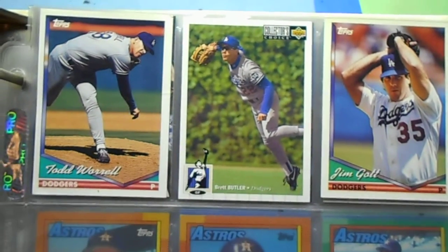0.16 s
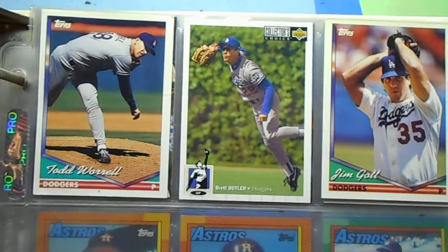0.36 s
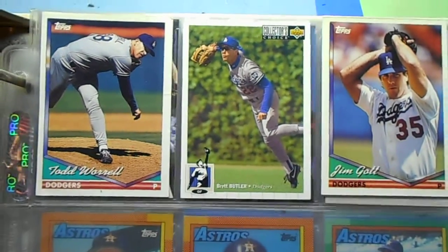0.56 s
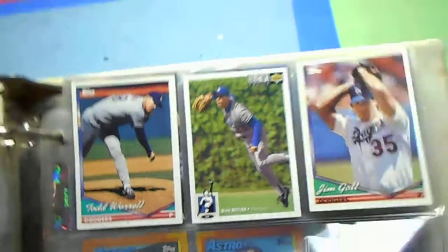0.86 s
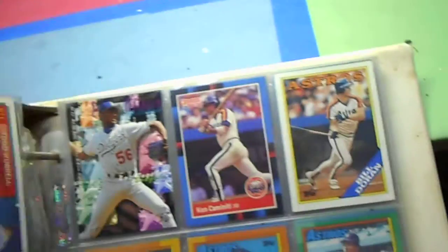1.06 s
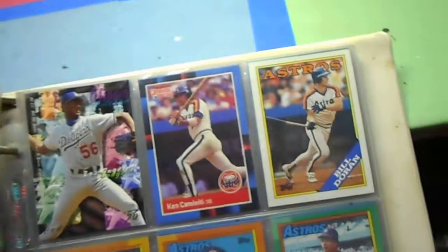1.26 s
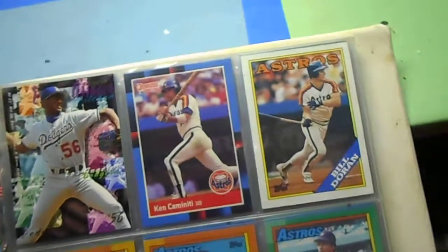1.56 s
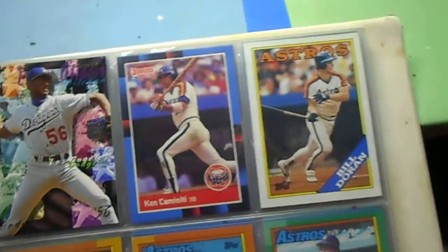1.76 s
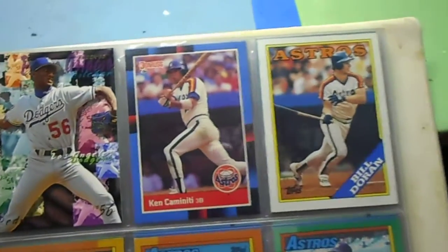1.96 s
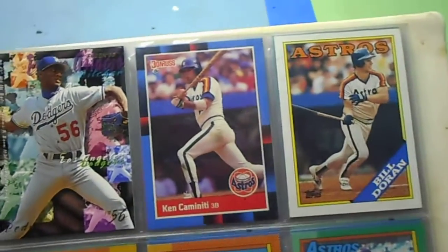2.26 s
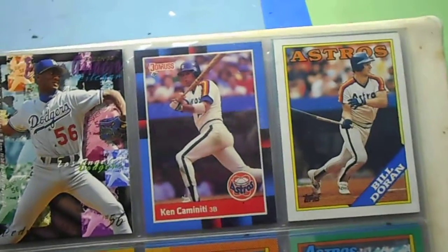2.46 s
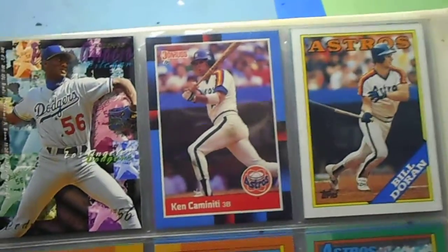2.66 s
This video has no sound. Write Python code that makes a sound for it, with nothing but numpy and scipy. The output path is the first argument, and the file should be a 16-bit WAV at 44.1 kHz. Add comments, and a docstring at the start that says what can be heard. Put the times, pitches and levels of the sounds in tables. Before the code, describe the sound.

A stiff plastic binder page flips with crackly rustling, followed by faint taps and a bright snap

```python
"""In a quiet small room, a plastic sleeve page full of cards is turned in a ring binder close to the microphone.
The page ticks on a ring (damped modes), slides (noise grains), crinkles and pops (short decaying sines)
and pushes air at the microphone (low noise). Two light taps, a brief brush and a faint squeak on a ring
(wavering resonances) follow, then a sharp, chattering click (bright modes and grit)."""
import sys
import numpy as np
from scipy import signal
from scipy.fft import rfft, irfft
from scipy.io import wavfile

SR = 44100
rng = np.random.default_rng(int(sys.argv[2]) if len(sys.argv) > 2 else 0)


def put_to_file(sound):
    """Save the sound as 16-bit audio at rate SR, in the file named by the first command-line argument."""
    columns = np.atleast_2d(sound).T  # one column per channel
    safe = np.clip(columns, -1, 1)
    whole_steps = np.round(safe * 32767)
    wavfile.write(sys.argv[1], SR, whole_steps.astype(np.int16))


N = 123479


def undb(db):
    """Decibels to gain."""
    return 10 ** (np.asarray(db) / 20)


def colour(x, points):
    """Shape a spectrum by (frequency [Hz], level [dB]) points, then scale to a standard deviation of 1."""
    hz, db = np.array(points).T
    bins_hz = np.maximum(np.arange(N // 2 + 1) * SR / N, 1)
    gain = undb(np.interp(np.log(bins_hz), np.log(hz), db))
    shaped = irfft(rfft(x) * gain, N)
    return shaped / np.std(shaped)


def noise(points):
    """Coloured Gaussian noise with a standard deviation of 1."""
    return colour(rng.standard_normal(N), points)


def curve(rows, axis=1):
    """Gain over time from one dB column of a table, silent outside it."""
    rows, t = np.array(rows), np.arange(N) / SR
    gain = undb(np.interp(t, rows[:, 0], rows[:, axis]))
    return gain * (t > rows[0, 0]) * (t < rows[-1, 0])


def add(out, start_s, sound):
    """Mix a sound in at a time."""
    i = int(start_s * SR)
    out[i:i + len(sound)] += sound[:N - i]


def decay_60db(t, t60):
    """Exponential decay by 60 dB in t60, in the unit of t."""
    return np.exp(-np.log(1000) * t / t60)


def fade(time_constant_s):
    """A short exponential decay."""
    return np.exp(-np.arange(SR // 6) / SR / time_constant_s)


def ring(modes):
    """Damped sines of a struck object."""
    t = np.arange(SR // 6) / SR
    return sum(undb(db) * np.sin(2 * np.pi * hz * t) * decay_60db(t, t60_s) for hz, db, t60_s in modes)


def highpass(x, hz):
    """Thin out the bass."""
    return signal.sosfilt(signal.butter(2, hz, "high", fs=SR, output="sos"), x)


def wander(points_per_s):
    """Random motion with a spread near 1: straight lines between Gaussian points."""
    steps = np.arange(N) / SR * points_per_s
    return 1.2 * np.interp(steps, np.arange(SR // 50), rng.standard_normal(SR // 50))


ROOM_T60_S, ROOM_ONSET_S = 0.22, 0.0012


def in_room(x, room_db):
    """Add the diffuse tail of a small room: decaying noise with a soft onset."""
    t = np.arange(SR // 2) / SR
    onset = 1 - np.exp(-(t / ROOM_ONSET_S) ** 2)
    tail = rng.standard_normal(len(t)) * decay_60db(t, ROOM_T60_S) * onset
    return x + undb(room_db) * signal.fftconvolve(x, tail / np.linalg.norm(tail))[:N]


# Room tone spectrum: (frequency [Hz], relative density [dB])
ROOM_TONE_COLOUR = [(15, -36), (25, 1.5), (240, -4.5), (394, -11), (1030, -16.5), (5160, -23.5),
                    (9890, -25), (12500, -45.5)]
ROOM_TONE_DB = -57


def room_tone():
    """Steady coloured noise of the quiet room."""
    return undb(ROOM_TONE_DB) * noise(ROOM_TONE_COLOUR)


# Air pushed at the microphone: (time [s], level [dB])
AIR_LEVEL = [(.6, -56.5), (.96, -51), (1.04, -60), (1.11, -32), (1.26, -47), (1.36, -41), (1.415, -28),
             (1.45, -42), (1.51, -34.5), (1.6, -51), (1.74, -47), (1.9, -66), (2.34, -58.5), (2.38, -41.5),
             (2.46, -66.5), (2.515, -46), (2.57, -59)]
# Air spectrum: (frequency [Hz], relative level [dB])
AIR_COLOUR = [(8, 6.5), (25, 1.5), (60, -2.5), (120, -6.5), (220, -32), (500, -48)]


def pushed_air():
    """The page pushes air at the microphone: low noise that swells and sinks."""
    return noise(AIR_COLOUR) * curve(AIR_LEVEL)


# Resonances of the rubbed ring: (frequency [Hz], width [Hz], relative level [dB])
SQUEAK_MODES = [(1182, 45, -2.5), (1443, 70, -3.5), (2435, 71, 3), (2934, 51, -9), (3560, 99, -3)]
SQUEAK_START_S, SQUEAK_END_S, SQUEAK_ATTACK_S, SQUEAK_RELEASE_S = 2.38, 2.728, 0.023, 0.19
SQUEAK_DB, SQUEAK_WAVER_RATIO, SQUEAK_WAVER_PER_S = -59.5, 0.00813, 11


def squeak():
    """A sleeve hole rubs along a metal ring, which sings faintly in narrow, wavering resonances."""
    t = np.arange(N) / SR
    attack = np.clip((t - SQUEAK_START_S) / SQUEAK_ATTACK_S, 0, 1)
    release = np.clip((SQUEAK_END_S - t) / SQUEAK_RELEASE_S, 0, 1)
    out = np.zeros(N)
    for hz, width_hz, db in SQUEAK_MODES:
        pitch_hz = hz * (1 + SQUEAK_WAVER_RATIO * wander(SQUEAK_WAVER_PER_S))
        phase = 2 * np.pi * np.cumsum(pitch_hz) / SR
        # random motion of both quadratures widens the line into a band
        out += undb(db) * (wander(2 * width_hz) * np.sin(phase) + wander(2 * width_hz) * np.cos(phase))
    return undb(SQUEAK_DB) * attack * release * out


# Light taps on the binder: (time [s], level [dB], weight of each mode [dB])
TAPS = [(2.1639, -41.5, (1, 2.5, -9, -3.5)), (2.226, -39.5, (0.5, -6, 0, -23))]
# Binder modes: (frequency [Hz], relative level [dB], t60 [s])
TAP_MODES = [(305, 1.5, 0.072), (1140, 2, 0.0051), (1840, 1, 0.012), (3740, -1, 0.033)]


def taps():
    """Light taps on the binder; the spot that is touched weights its modes."""
    out = np.zeros(N)
    for start_s, db, weights_db in TAPS:
        modes = [(hz, mode_db + w, t60_s) for (hz, mode_db, t60_s), w in zip(TAP_MODES, weights_db)]
        add(out, start_s, undb(db) * ring(modes))
    return out


# Sleeve ticking on a ring: (frequency [Hz], level re TICK_DB [dB], t60 [s])
TICK_MODES = [(603, -15.5, 0.012), (1100, -14.5, .0056), (1335, -6, 0.012), (1415, -36, 0.18),
              (1850, -10, 0.011), (3620, 0.5, 0.0095), (5940, -7, 0.004)]
# Cover hum under the knock: (frequency [Hz], level [dB], t60 [s])
COVER_MODE = [(138.7, -44, .3)]
# Spectrum of cracks and snaps: (frequency [Hz], relative level [dB])
SNAP_COLOUR = [(200, -8), (1000, -1.5), (3000, 4), (7000, -5.5), (10000, -10.5), (12000, -46)]
TICK_START_S, TICK_DB, TICK_LOW_HZ = .668, -15.5, 300
CRACK_DB, CRACK_DECAY_S = -15.5, 0.00075
SHIVER_DB, SHIVER_DECAY_S, SHIVER_HZ = -42.5, 0.039, 3900


def ring_tick():
    """The lifted page knocks on a binder ring: crack, damped modes, shivering film and humming cover."""
    modes, crack, shiver, cover = np.zeros((4, N))
    add(modes, TICK_START_S, undb(TICK_DB) * ring(TICK_MODES))
    add(crack, TICK_START_S, undb(CRACK_DB) * fade(CRACK_DECAY_S))
    add(shiver, TICK_START_S, undb(SHIVER_DB) * fade(SHIVER_DECAY_S))
    add(cover, TICK_START_S, ring(COVER_MODE))
    film = shiver * noise([(SHIVER_HZ / 2, -22), (SHIVER_HZ, 0), (SHIVER_HZ * 2, -26)])
    return highpass(modes + crack * noise(SNAP_COLOUR) + film, TICK_LOW_HZ) + cover


# Contacts of the click: (time [s], level re CLICK_DB [dB])
CLICK_CONTACTS = [(2.753, -3), (2.7535, -2), (2.7547, 2.5), (2.7557, 2.5), (2.757, -7.5), (2.759, -5.5),
                  (2.7626, -17)]
# Hard plastic modes: (frequency [Hz], relative level [dB], t60 [s])
CLICK_MODES = [(2070, -21, 0.012), (2990, -28, 0.031), (4040, -14.5, 0.018), (4900, -6, 0.013),
               (5010, -28.5, 0.15), (5740, -2.5, 0.009), (6980, 1, .01), (7370, -27, 0.098),
               (7590, -1.5, 0.012), (9500, -8.5, .006), (10140, -13.5, 0.011)]
CLICK_DB, CLICK_LOW_HZ, CLICK_DETUNE_RATIO = -9, 1360, 0.0034
GRIT_DB, GRIT_DECAY_S = -22, 0.00073  # level re each contact


def sharp_click():
    """Hard plastic snaps: a quick run of gritty contacts rings slightly detuned bright modes."""
    out, grit = np.zeros((2, N))
    chances = rng.standard_normal((len(CLICK_CONTACTS), len(CLICK_MODES)))
    for (start_s, db), chance in zip(CLICK_CONTACTS, chances):
        for (hz, mode_db, t60_s), c in zip(CLICK_MODES, chance):
            mode = ring([(hz * (1 + CLICK_DETUNE_RATIO * c), mode_db, t60_s)])
            add(out, start_s, undb(db) * np.sign(c) * mode)
        add(grit, start_s, undb(db + GRIT_DB) * fade(GRIT_DECAY_S))
    grit_noise = noise([(500, -13), (2000, -23), (6500, 15), (10000, -1), (12000, -27)])
    click = undb(CLICK_DB) * (out + grit * grit_noise)
    return highpass(highpass(click, CLICK_LOW_HZ), CLICK_LOW_HZ)


FLEX_DB, FLEX_PER_S, FLEX_OCTAVES = 3, 45, 0.3006  # dB per unit of wander; rate; band spacing


def flex(x):
    """The bending film strengthens and weakens overlapping neighbouring bands, each on its own."""
    octave = np.log2(np.clip(np.arange(N // 2 + 1) * SR / N, 200, 12000) / 200)
    spectrum, out = rfft(x), np.zeros(N)
    for k in range(int(octave[-1] / FLEX_OCTAVES) + 2):
        band_gain = np.maximum(1 - abs(octave / FLEX_OCTAVES - k), 0)
        band = irfft(spectrum * band_gain, N)
        out += band * undb(FLEX_DB * np.minimum(wander(FLEX_PER_S), 2))
    return out * np.std(x) / np.std(out)


# Sliding sleeve: (time [s], body level [dB], treble level [dB])
TURN = [(.55, -61.5, -66), (.76, -64, -56.5), (.81, -58, -55.5), (.88, -55, -57), (.96, -51.5, -55),
        (1.0, -60.5, -66.5), (1.05, -49.5, -45), (1.10, -39.5, -36.5), (1.14, -37.5, -37),
        (1.175, -43, -52.5), (1.22, -46.5, -45), (1.27, -42, -49.5), (1.31, -39, -44), (1.345, -37, -47),
        (1.385, -28, -31.5), (1.402, -33, -34), (1.413, -23.5, -35.5), (1.435, -39, -33),
        (1.485, -34, -37.5), (1.505, -26, -36.5), (1.54, -39, -48.5), (1.61, -43, -47), (1.645, -39.5, -40),
        (1.69, -48, -50), (1.715, -46, -39.5), (1.75, -42, -54), (1.78, -51, -46.5), (1.84, -47, -59),
        (1.89, -62, -68)]
# Settled page brushed twice: (time [s], body level [dB], treble level [dB])
BRUSH = [(2.33, -69, -69), (2.375, -58, -48.5), (2.41, -58, -56.5), (2.46, -57.5, -59.5),
         (2.498, -60, -48.5), (2.52, -61, -66)]
# Sleeve body spectrum: (frequency [Hz], relative level [dB])
BODY_COLOUR = [(70, -4), (160, 4), (450, 1), (900, -0.5), (1400, -3), (2200, -12), (4000, -60)]
# Sleeve treble spectrum: (frequency [Hz], relative level [dB])
TREBLE_COLOUR = [(700, -13.5), (1500, 2.5), (2500, 2), (4000, -1.5), (6500, -6.5), (10000, -11),
                 (11000, -26), (12300, -24)]
GRAINS_PER_S, GRAIN_SCATTER_DB, GRAIN_DECAY_S = 1300, 1.5, 0.00092  # scatter per unit of exponential draw
SMOOTH_SHARE = 1  # constant grip against grains of unit spread
CATCHES_PER_S, CATCH_DB = 70, 3  # dB per unit of catching


def rustle():
    """Dense stick-slip grains excite the body and treble of the sleeve, which catches and lets go."""
    size_db = GRAIN_SCATTER_DB * np.minimum(rng.exponential(size=N), np.pi)
    slips = (rng.random(N) < GRAINS_PER_S / SR) * undb(size_db)
    grains = signal.fftconvolve(slips, fade(GRAIN_DECAY_S))[:N]
    steps = np.arange(N) / SR * CATCHES_PER_S
    catching = np.interp(steps, np.arange(N), rng.uniform(-1.4, 1.5, N))
    grip = (SMOOTH_SHARE + grains / np.std(grains)) * undb(CATCH_DB * catching)
    body = colour(grip * rng.standard_normal(N), BODY_COLOUR)
    treble = colour(grip * rng.standard_normal(N), TREBLE_COLOUR)
    body *= curve(TURN) + curve(BRUSH)
    treble *= curve(TURN, axis=2) + curve(BRUSH, axis=2)
    return flex(body + treble)


POP_RISE_CYCLES, POP_T60_CYCLES = 0.41, 7.47


def pop(hz):
    """A patch of film swings up and dies away within a few cycles."""
    cycles = np.arange(SR // 12) / SR * hz
    rise = 1 - np.exp(-cycles / POP_RISE_CYCLES)
    return np.sin(2 * np.pi * cycles) * rise * decay_60db(cycles, POP_T60_CYCLES)


CRINKLES_PER_S, CRINKLE_LOW_HZ = 190, 210
CRINKLE_DB, CRINKLE_SCATTER_DB = 5, 3  # re TURN treble; per unit of exponential draw
CRINKLE_HZ, CRINKLE_OCTAVES = 1670, 1.92  # centre pitch; range each way


def crinkles():
    """Small creases pop at random times and pitches, following the treble level of the turn."""
    out, bend = np.zeros(N), curve(TURN, axis=2)
    for when, size, pitch, side in rng.random((int(CRINKLES_PER_S * N / SR), 4)):
        hz = CRINKLE_HZ * 2 ** (CRINKLE_OCTAVES * (2 * pitch - 1))
        size_db = CRINKLE_DB + CRINKLE_SCATTER_DB * min(-np.log(1 - size), 2)
        gain = bend[int(when * N)] * undb(size_db)
        add(out, when * N / SR, np.sign(side - .5) * gain * pop(hz))
    return highpass(out, CRINKLE_LOW_HZ)


# Buckling creases: (time [s], pitch [Hz], pop level re POP_DB [dB], bright snap level [dB])
CREASES = [(.647, 940, -35.5, -40), (.817, 517, -30, -36.5), (.823, 1030, -23.5, -44),
           (.869, 625, -35.5, -41), (.947, 394, -32.5, -44), (.948, 1610, -30, -55),
           (.952, 706, -29.5, -54), (.974, 700, -31.5, -52), (1.109, 2600, -36, -29.5),
           (1.139, 1520, -22, -35), (1.167, 780, -21.5, -50), (1.251, 970, -30.5, -48),
           (1.298, 1710, -28, -32), (1.382, 800, -10.5, -36), (1.4075, 1410, -9, -16.5),
           (1.409, 2260, -14, -15), (1.412, 270, -17.5, -24), (1.4153, 99, -18.5, -21),
           (1.4762, 1480, -11, -24), (1.4905, 460, -19.5, -25), (1.496, 286, -17.5, -22.5),
           (1.4997, 480, -23, -29), (1.553, 740, -19, -47), (1.571, 1980, -18, -29.5),
           (1.5828, 575, -13.5, -36), (1.632, 1720, -24.5, -35.5), (1.637, 1800, -22.5, -36),
           (1.729, 2340, -18, -24.5), (1.765, 4140, -24, -39), (1.803, 1620, -25.5, -32),
           (1.82, 4030, -44, -33), (1.849, 2860, -20, -47), (2.369, 1230, -43, -35),
           (2.391, 2000, -46, -34.5), (2.497, 1140, -30.5, -40.5), (2.6766, 1900, -38, -48),
           (2.682, 1960, -37, -45)]
POP_DB, PARTIAL_DB, SNAP_DECAY_S = 3, -9.5, 0.001  # partials re main pitch
PARTIAL_SPREAD = 0.6  # largest log pitch ratio


def creases():
    """Each crease snaps through and rings a patch of film: one main pitch and two scattered partials."""
    pops, snaps = np.zeros((2, N))
    chances = rng.standard_normal((len(CREASES), 2))
    for (start_s, hz, pop_db, snap_db), chance in zip(CREASES, chances):
        partials = sum(np.sign(c) * pop(hz * np.exp(PARTIAL_SPREAD * np.tanh(c))) for c in chance)
        add(pops, start_s, undb(pop_db + POP_DB) * (pop(hz) + undb(PARTIAL_DB) * partials))
        add(snaps, start_s, undb(snap_db) * fade(SNAP_DECAY_S))
    return pops + snaps * noise(SNAP_COLOUR)


PAGE_ROOM_DB, TICK_ROOM_DB, CLICK_ROOM_DB = -12, -12.5, -15.5


def scene():
    """Page, air, tick and click over the tone of the room."""
    page = in_room(squeak() + taps() + rustle() + crinkles() + creases(), PAGE_ROOM_DB)
    tick = in_room(ring_tick(), TICK_ROOM_DB)
    click = in_room(sharp_click(), CLICK_ROOM_DB)
    return (room_tone() + pushed_air() + tick + click + page)[None]


OVERLOAD = 0.83  # level at which the microphone rounds off
ROLLOFF_HZ, TOP_HZ = 10800, 12200


def record(dry):
    """The microphone rounds the loudest peaks and falls off in the top treble; the top is cut."""
    rounded = OVERLOAD * np.tanh(dry / OVERLOAD)
    soft = signal.sosfilt(signal.butter(8, ROLLOFF_HZ, fs=SR, output="sos"), rounded)
    return signal.sosfilt(signal.ellip(8, .2, 70, TOP_HZ, fs=SR, output="sos"), soft)


dry = scene()
out = record(dry)
put_to_file(out)
```